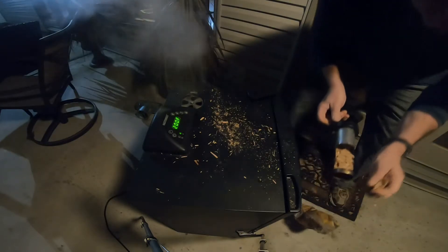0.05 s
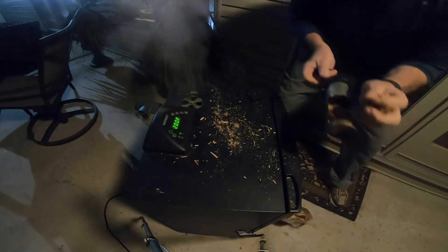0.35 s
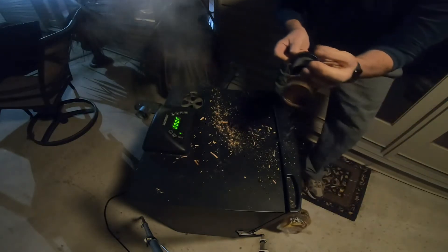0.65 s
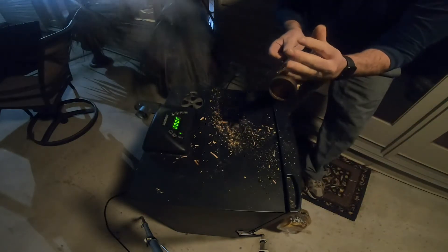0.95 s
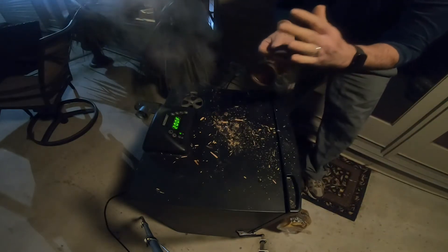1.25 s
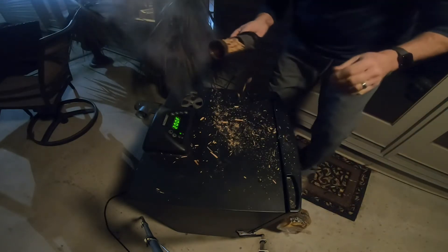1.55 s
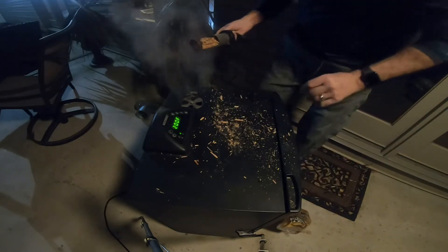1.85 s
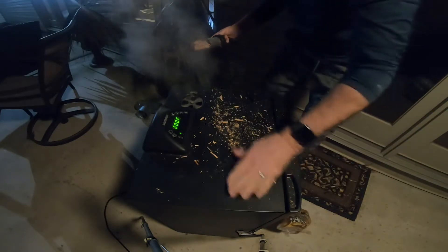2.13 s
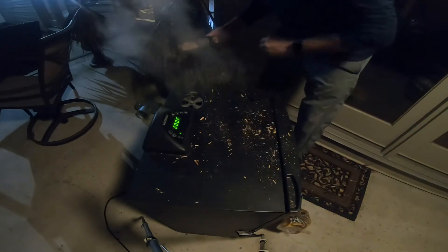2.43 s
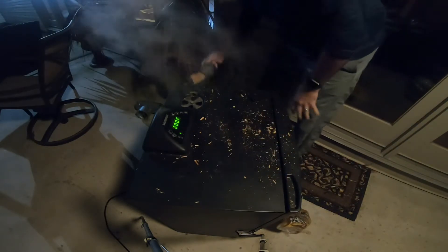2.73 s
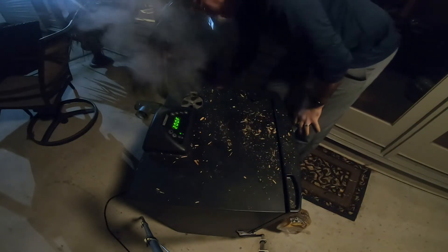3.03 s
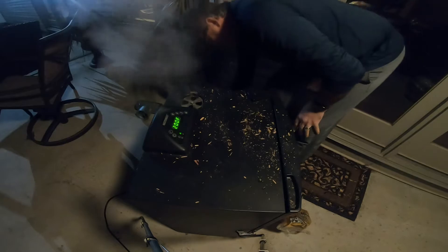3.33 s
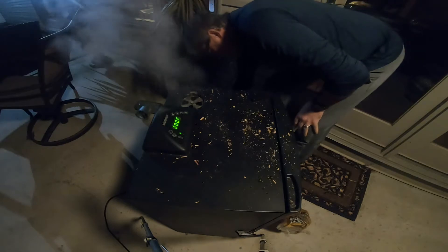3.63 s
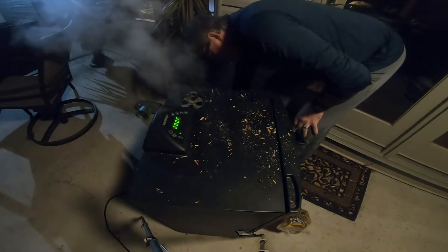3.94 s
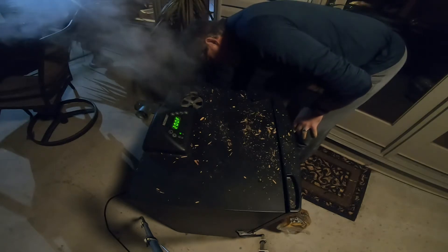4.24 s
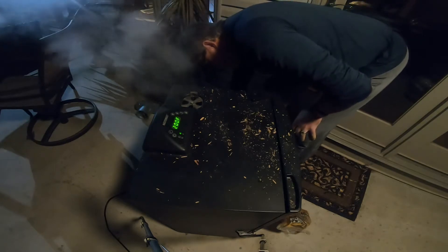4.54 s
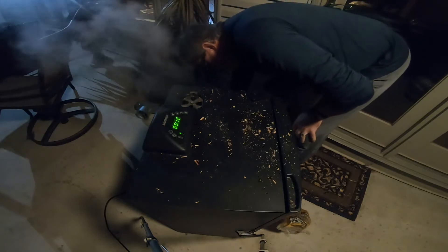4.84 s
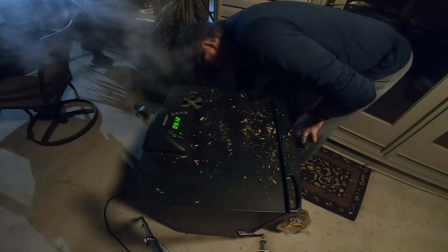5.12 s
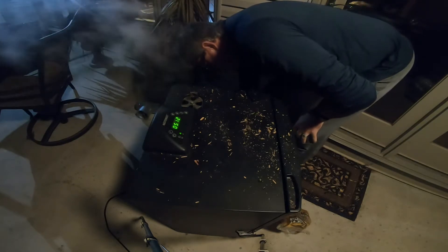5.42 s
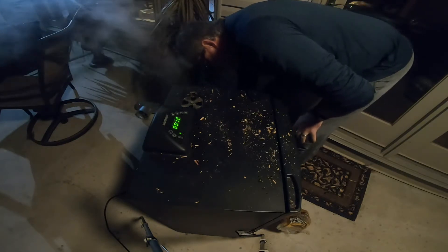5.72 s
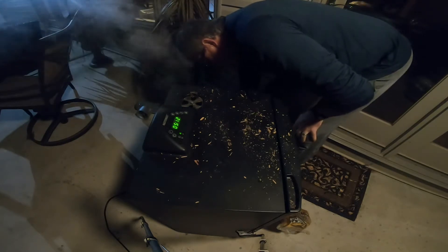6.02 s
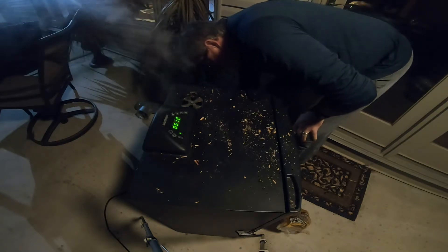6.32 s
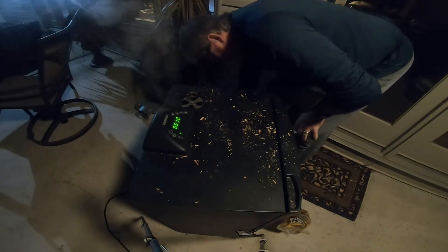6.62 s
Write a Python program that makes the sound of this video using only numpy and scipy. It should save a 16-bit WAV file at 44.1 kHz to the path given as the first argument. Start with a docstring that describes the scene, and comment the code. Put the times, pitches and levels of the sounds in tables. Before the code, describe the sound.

After gritty footsteps, ticking wood chips and a soft sizzle, a metal tube twists into a smoker with scrapes and booming knocks.

```python
"""On a porch at night someone steps up to an electric smoker, shoes scuffing on gritty concrete.
Dry wood chips shift and tick in the metal loader tube they carry. At about 2 seconds a hand sweeps
spilled chips off the lid; then the smouldering tray flares into a soft sizzle that dies away.
From about 3.7 seconds the tube is pushed into its port and twisted: it scrapes, squeaks and knocks,
and the hollow steel cabinet booms."""
import sys
import numpy as np
from scipy import signal
from scipy.fft import rfft, irfft, next_fast_len
from scipy.io import wavfile
from scipy.ndimage import uniform_filter1d, map_coordinates

SR = 44100
rng = np.random.default_rng(int(sys.argv[2]) if len(sys.argv) > 2 else 0)


def int16_out(signal):
    """Quantize to a 16-bit WAV file."""
    q = np.round(np.clip(np.atleast_2d(signal).T, -1, 1) * 32767)
    wavfile.write(sys.argv[1], SR, q.astype(np.int16))


N = 294147
HIT_TIME = np.arange(SR // 2) / SR  # seconds since a blow

# The loader tube's notes. Each row: pitch in Hz, level in dB, t60 (seconds to fade by 60 dB).
TUBE_NOTES = [(2027, -11.5, 0.16), (2000, 1, 0.067), (2250, -6, 0.14), (2500, -10, 0.1), (3070, -15, 0.16),
              (4300, -15, 0.18), (5800, -4.5, 0.11), (6270, -2.5, 0.089)]
# The notes of the sheet steel around the port. Each row: pitch in Hz, level in dB, t60 in seconds.
STEEL_NOTES = [(516, 3, 0.11), (640, -0.5, 0.083), (722, -19, 0.081), (853, -4, 0.34), (962, -2, 0.077),
               (1180, -11, 0.16), (1287, -2, 0.13), (1572, -3.5, 0.14), (1702, -2.5, 0.12),
               (1813, -8.5, 0.3), (2005, -2, 0.091), (2304, -8.5, 0.17), (2640, -12.5, 0.082),
               (2923, -9, 0.14), (4020, -28, .1)]


def amp(db):
    """Turn decibels into a gain."""
    return 10 ** (np.asarray(db) / 20)


def unit(x):
    """Scale a sound to an average (rms) level of 1."""
    return x / np.sqrt(np.mean(x ** 2) + 1e-20)


def crest(x):
    """Scale a blow so that its loudest 4 ms have an rms level of 1."""
    power = uniform_filter1d(np.mean(np.atleast_2d(x) ** 2, axis=0), size=SR // 250)
    return x / np.sqrt(power.max() + 1e-20)


def along(points, hz):
    """Read between (Hz, value) points on a log frequency scale."""
    point_hz, values = np.transpose(points)
    return np.interp(np.log(hz + 1), np.log(point_hz + 1), values)


def wobble(rate):
    """A smooth curve through `rate` random values a second."""
    return map_coordinates(rng.standard_normal(int(N * rate / SR) + 4), [np.arange(N) * rate / SR])


def colour(x, spectrum):
    """Filter a sound by (Hz, dB) points, falling 24 dB an octave beyond their ends."""
    n = x.shape[-1]
    m = 2 * next_fast_len(n // 2 + 4096)
    hz = np.fft.rfftfreq(m, 1 / SR) + 1
    octaves_out = np.log2(hz / np.clip(hz, spectrum[0][0], spectrum[-1][0]))
    gain = np.maximum(amp(along(spectrum, hz) - 24 * np.abs(octaves_out)), 1e-5)
    cepstrum = irfft(np.log(gain))
    cepstrum[1:m // 2] *= 2  # folded so the filter rings after a blow, never before
    cepstrum[m // 2 + 1:] = 0
    return irfft(rfft(x, m) * np.exp(rfft(cepstrum)), m)[..., :n]


def stereo(pair):
    """Blend two unrelated signals into left and right, most alike near 260 and 4500 Hz."""
    # Each row: frequency in Hz, how alike the ears are from 0 to 1.
    likeness = [(30, 0.02), (110, 0), (260, 0.74), (700, 0), (2000, 0.21), (4500, 0.79), (8000, 0),
                (13000, 0.09)]
    m = next_fast_len(pair.shape[-1])
    turn = np.arccos(np.clip(along(likeness, np.fft.rfftfreq(m, 1 / SR)), -1, 1)) / 2
    mid, side = irfft(rfft(pair, m) * [np.cos(turn), np.sin(turn)], m)[:, :pair.shape[-1]]
    return np.array([mid + side, mid - side])


def pan(db):
    """Gains that make the left ear `db` louder than the right."""
    return amp([[db / 2], [-db / 2]])


def add(track, start, sound):
    """Mix a sound into the track at `start` seconds."""
    first = max(round(start * SR), 0)
    track[:, first:first + sound.shape[-1]] += sound[..., :N - first]


def strokes(rows, swell_share, t60):
    """A gain curve from (start, length, dB) rows: each swells, holds, then dies away."""
    t, power = np.arange(N) / SR, np.zeros(N)
    for start, length, db in rows:
        swell = np.sin(np.pi / 2 * np.clip((t - start) / (swell_share * length), 0, 1)) ** 2
        power += (swell * amp(db - 60 * np.clip((t - start - length) / t60, 0, 2))) ** 2
    return np.sqrt(power)


def grains(spectrum, rate, spread_db, smooth):
    """Tiny clicks of random size, `rate` a second, mixed with smooth rubbing noise."""
    sizes = (rng.random(N) < rate / SR) * amp(spread_db * np.clip(rng.standard_normal(N), -2, 2))
    force = unit(sizes * rng.standard_normal((2, N))) + smooth * rng.standard_normal((2, N))
    return unit(colour(stereo(force), spectrum))


def burst(spectrum, t60, tail_db, tail_t60):
    """A crack of noise with a quick fade and a slower tail."""
    fade = amp(-60 * HIT_TIME / t60) + amp(tail_db - 60 * HIT_TIME / tail_t60)
    return crest(colour(stereo(rng.standard_normal((2, len(HIT_TIME)))) * fade, spectrum))


def ring(notes, scatter_db, attack_s, apart, bass_db=0, bass_hz=150, rattle=0):
    """A struck object's fading notes; `rattle` blurs their pitch, `apart` spreads them between the ears."""
    hz, db, t60 = np.transpose(notes)[:, :, None]
    size, detune, phase, side = rng.standard_normal((4, len(notes), 1))
    level = db + scatter_db * size + bass_db / (1 + (hz / bass_hz) ** 6) - 60 * HIT_TIME / t60
    blur = rattle * np.cumsum(rng.standard_normal(level.shape), axis=1)
    swing = 2 * np.pi * hz * (1 + 0.0045 * detune) * HIT_TIME + 0.31 * phase + blur
    ears = np.array([np.sum(amp(level) * np.sin(swing + ear * apart * side), axis=0) for ear in (1, -1)])
    onset = 1 - np.exp(-HIT_TIME / attack_s)
    return crest(colour(ears * onset, [(75, 0.023), (15000, 0.0027)]))  # the deepest bass falls away below 75 Hz


def sing(ringing):
    """Rubbing is a stream of tiny random blows that keeps an object ringing."""
    return unit(signal.fftconvolve(rng.standard_normal((1, N)), ringing, axes=1)[:, :N])


def night_air():
    """Quiet, steady outdoor noise, mostly low."""
    # Each row: frequency in Hz, level in dB.
    air_tone = [(12, -28.5), (20, -10.5), (54, 4), (101, -5.5), (175, 1), (534, -17.5), (767, -8),
                (857, -11), (1100, -20), (1380, -18.5), (2470, -26.5), (6360, -28.5), (8400, -33.5),
                (12400, -36.5), (15500, -42)]
    return amp(-64.5) * unit(colour(stereo(rng.standard_normal((2, N))), air_tone))


def sizzle():
    """Chips shift in the tube and smoulder in the tray, which flares once and dies away."""
    # The load shifting as it is carried. Each row: start in seconds, length in seconds, level in dB.
    shifts = [(0.0, 0.0055, -61), (0.2, 0.62, -74.5), (0.9, 0.25, -82), (1.35, 0.33, -72)]
    # The fine sizzle. Each row: frequency in Hz, level in dB.
    sizzle_tone = [(880, -26), (1500, -10), (1820, -10), (2030, -11.5), (3380, -7.5), (4480, -14),
                   (6370, -3.5), (7450, -6.5), (8370, -17), (12700, -26), (15500, -37)]
    flare_at_s, flare_db, rise_s, dying_db_per_s = 2.81, 12, 0.033, 22
    since_flare = np.maximum(np.arange(N) / SR - flare_at_s, 0)
    smoulder = amp(-80.5 + flare_db * np.minimum(since_flare / rise_s, 1) - dying_db_per_s * since_flare)
    shifting = strokes(shifts, swell_share=0.17, t60=0.53)
    return amp(8) * np.hypot(smoulder, shifting) * grains(sizzle_tone, rate=490, spread_db=6, smooth=1.7)


def knocks():
    """Blows on the smoker: the wall thuds, the hollow cabinet booms, hard contacts add a steel clank."""
    # Each row: start in seconds, level in dB, depth in dB, hardness in dB.
    blows = [(0.011, -41, -29, -7.5), (2.1425, -27.5, -43, -14), (3.684, -36, -27, -12.5),
             (3.751, -24, -10.5, -23), (4.268, -30.5, -50, -3), (4.424, -27.5, -9, -22.5),
             (4.89, -22.5, -15, -25), (4.937, -30.5, -15, -10.5), (4.977, -12.5, -4, -27.5),
             (5.133, -31, -31, -41), (5.39, -15.5, -4.5, -26), (6.298, -23.5, -9, -26)]
    # The cabinet's panels and hollow. Each row: pitch in Hz, level in dB, undamped t60 in seconds.
    cabinet_notes = [(61.4, -16.5, 0.3), (104.2, -12.5, 0.36), (135.5, -1, 0.2), (178.7, 1, 0.23),
                     (196, -2, 0.31), (218.5, 0, 0.23), (257.2, -2, 0.23), (271, -14, 0.042),
                     (331.6, -8, 0.25), (391.6, -19, 1), (459.3, -21.5, 0.35)]
    # The low, middle and high parts of a blow. Each row: frequency in Hz, level in dB.
    thud_tone = [(70, -29), (115, -0.5), (165, 1), (270, 3), (380, -10), (650, -23)]
    clank_tone = [(200, -29.5), (450, -8), (700, 2), (1300, -4), (2000, -1), (3000, -10.5), (5000, -17)]
    clink_tone = [(1500, -26.5), (2800, 5), (3800, 0), (5000, -9.5), (6800, 1), (8000, -8), (9500, -18.5),
                  (15000, -35)]
    out = np.zeros((2, N))
    thud = crest(colour(signal.unit_impulse(len(HIT_TIME)), thud_tone))
    damping = amp(-2 - 60 * HIT_TIME / 2.1)  # the hand on the tube damps the panels
    seating = 1 - np.exp(-HIT_TIME / 0.00093)  # the rim meets its stop bit by bit
    for start, db, depth_db, hard_db in blows:
        boom = ring(cabinet_notes, scatter_db=3, attack_s=0.0026, apart=0.18, bass_db=depth_db + 13.5)
        clank = burst(clank_tone, t60=0.14, tail_db=-10, tail_t60=0.23)
        sheet = ring(STEEL_NOTES, scatter_db=1, attack_s=0.0012, apart=0.31)
        clink = burst(clink_tone, t60=0.13, tail_db=-10, tail_t60=0.27)
        steel = seating * amp(hard_db) * (clank + amp(-3.5) * sheet + amp(-6.5) * clink)
        add(out, start, amp(db - 6.5) * (amp(depth_db + 3.5) * thud + damping * boom + steel))
    return out


def chip_ticks():
    """Single chips snap against the tube; the loose load blurs its ring."""
    # The clearest chip and finger ticks. Each row: start in seconds, level in dB, tube ring in dB.
    ticks = [(0.0989, -30, -5.5), (0.5064, -34, -20), (0.7188, -54.5, 9.5), (0.835, -44.5, 8.5),
             (0.9178, -45.5, -1), (0.992, -35, -14), (1.0577, -36.5, -21), (1.0858, -39.5, -6),
             (1.3763, -43.5, -21), (1.453, -41, -15), (1.5685, -23, -39), (1.6191, -30, -4.5),
             (1.6496, -38, -20), (1.702, -28.5, -14), (1.8135, -38.5, -22), (2.2454, -22.5, -19),
             (2.278, -39, -19), (2.362, -43, -15.5), (2.5263, -36.5, 0), (2.8343, -56, -6)]
    # A tick's body and its bright edge. Each row: frequency in Hz, level in dB.
    snap_tone = [(250, -8.5), (600, -11.5), (1700, -2), (3200, -2), (4500, -10.5), (7000, -12.5),
                 (12000, -41.5)]
    edge_tone = [(2500, -46), (4500, -4), (6300, 11.5), (7500, 6), (8500, -5), (15000, -25.5)]
    out = np.zeros((2, N))
    slots = np.linspace(0.7, 1.9, 15)  # seconds; one faint stray tick in each gap as the tube is lifted
    strays = [(rng.uniform(a, b), -54 + 1.5 * rng.standard_normal(), -10) for a, b in zip(slots, slots[1:])]
    for start, db, ring_db in strays + ticks:
        edge_db = -5.5 - 0.7 * (db + 42)  # heavier chips sound duller
        snap = burst(snap_tone, t60=0.026, tail_db=-5.5, tail_t60=0.092)
        edge = burst(edge_tone, t60=0.012, tail_db=3.5, tail_t60=0.11)
        tube = ring(TUBE_NOTES, scatter_db=4, attack_s=0.0003, apart=0.5, rattle=0.14)
        add(out, start, amp(db - 12) * (snap + amp(edge_db) * edge + amp(ring_db + 1.5) * tube))
    return out


def shoes():
    """Soles land with a hollow note and grind grit over the concrete."""
    # Each row: start in seconds, length in seconds, grit level in dB, dB added for the sole.
    scuffs = [(0.1, 0.036, -38.5, -1), (0.188, 0.044, -40, -0.5), (0.339, 0.11, -53, -11),
              (0.469, 0.069, -46, 3.5)]
    # Footfalls and taps. Each row: start in seconds, level in dB, weight in dB, note in Hz, note in dB.
    steps = [(0.119, -32, -5, 746, 6), (0.207, -30, -9, 820, -21), (0.509, -30, -19, 509, -4.5),
             (1.721, -27, -5, 468.7, -3.5), (2.054, -45.5, -3.5, 821, 2.5), (2.528, -39.5, -20, 678, -11.5)]
    # Grinding grit, rubbing sole and landing tread. Each row: frequency in Hz, level in dB.
    grit_tone = [(530, -16.5), (900, -1.5), (967, -6), (1160, -2.5), (1430, -6), (1950, -1.5), (3300, -7.5),
                 (4550, -15.5), (7320, -7), (8750, -20), (12500, -28.5), (15500, -65)]
    sole_tone = [(76, -48), (130, -31), (174, -4), (354, -12), (506, -1), (552, -8), (715, -2),
                 (827, -22.5), (1300, -3), (1690, -27), (2860, -120)]
    tread_tone = [(150, -32), (450, -5.5), (750, 0), (1200, -7), (2400, -8.5), (4500, -23.5), (7000, -14.5),
                  (9000, -28), (15000, -36)]
    starts, lengths, grit_db, sole_db = np.transpose(scuffs)
    grit = grains(grit_tone, rate=3000, spread_db=4, smooth=0.7) * amp(wobble(130))
    sole = grains(sole_tone, rate=750, spread_db=5.5, smooth=0.5)
    grit_gain = strokes(zip(starts, lengths, grit_db), swell_share=0.56, t60=0.34)
    sole_gain = strokes(zip(starts, lengths, grit_db + sole_db), swell_share=0.56, t60=0.31)
    out = amp(-1.5) * grit_gain * grit + amp(-6) * sole_gain * sole
    for start, db, weight_db, note_hz, note_db in steps:
        tread = burst(tread_tone, t60=0.12, tail_db=0.5, tail_t60=0.17)
        weight = burst([(140, -20.5), (200, -6), (350, -11.5), (600, -21.5)],
                       t60=0.053, tail_db=9, tail_t60=0.26)
        note = ring([(note_hz, 0, 0.13)], scatter_db=0, attack_s=0.00083, apart=0.56, rattle=0.037)
        add(out, start, amp(db - 10) * (tread + amp(weight_db + 3) * weight + amp(note_db) * note))
    return out * pan(-2)


def rim_rubs():
    """A finger or the port lightly rubs the tube's rim and makes it sing."""
    # Each row: start in seconds, length in seconds, level in dB.
    rubs = [(0.765, 0.034, -61.5), (4.4, 0.11, -65.5)]
    singing = sing(ring(TUBE_NOTES, scatter_db=1, attack_s=0.0003, apart=0.4))
    bright = colour(singing, [(1500, -4), (2400, 0.5), (4200, 9), (5500, -1), (7000, 5)])
    return strokes(rubs, swell_share=0.38, t60=0.2) * bright


def lid_sweep():
    """Swept chips skid over the lid, which drums under them; they crackle finer as the hand speeds up."""
    # Rustling chips, their skid and the drumming lid. Each row: frequency in Hz, level in dB.
    rustle_tone = [(290, -9.5), (500, 3), (716, -5), (915, -3.5), (997, -7.5), (1410, -0.5), (2500, -7.5),
                   (2980, -1.5), (4200, -13), (6850, -3.5), (8150, -15), (12500, -21), (15600, -33)]
    skid_tone = [(400, -10), (520, -9), (750, -15), (1000, -18), (1450, 5), (2200, 9), (3000, -1),
                 (4000, -10)]
    lid_tone = [(71, -44), (120, -20), (161, -8), (242, -8), (291, -17.5), (382, -13.5), (700, -40),
                (910, -57), (1540, -120)]
    crackle_tone = [(3000, -21), (6500, -6.5), (8500, 2), (15500, -5)]
    chips_gain = strokes([(2.1512, 0.11, -39)], swell_share=0.51, t60=0.12)
    lid_gain = strokes([(2.172, 0.0892, -43)], swell_share=0.51, t60=0.22)
    speed = np.interp(np.arange(N) / SR, [2.18, 2.3], [0, 1])
    rustle = grains(rustle_tone, rate=3000, spread_db=4, smooth=0.6)
    skid = amp(-8.5) * (1 - speed) * grains(skid_tone, rate=1400, spread_db=4, smooth=0.73)
    crackle = amp(-9.5) * speed * grains(crackle_tone, rate=4200, spread_db=3.5, smooth=0.33)
    drum = lid_gain * grains(lid_tone, rate=570, spread_db=4.5, smooth=0.52)
    return chips_gain * (rustle + skid + crackle) * pan(0.41) + drum


def wander(x, depth_db=3, width_hz=130, lasting_s=0.038):
    """Narrow bands of a rubbing sound rise and sink as the point of contact moves."""
    hz, t, spectra = signal.stft(x, SR, nperseg=512)
    over_pitch = np.exp(-(np.fft.fftfreq(len(hz), hz[1]) * width_hz * 2) ** 2)[:, None]
    over_time = np.exp(-(np.fft.fftfreq(len(t), t[1]) * lasting_s * 2) ** 2)
    patches = np.fft.ifft2(np.fft.fft2(rng.standard_normal(spectra.shape[1:])) * over_pitch * over_time)
    return unit(signal.istft(spectra * amp(depth_db * unit(patches.real)), SR, nperseg=512)[1][:, :N])


def tube_scrapes():
    """The tube sticks and slips in its port: the cabinet rumbles, the rim rasps and hisses, steel sings."""
    # Each row: start and length in seconds, rasp level in dB, dB added for rumble, dB added for hiss.
    pushes = [(3.76, 0.041, -72.5, 29.5, -3), (4.266, 0.016, -46, 10, 0.5), (4.411, 0.059, -59, 23, -4.5),
              (4.531, 0.19, -61, 15, -1), (4.723, 0.18, -52, 9, -7.5), (4.87, 0.063, -53, 22.5, -8),
              (4.927, 0.064, -42.5, 13, -19.5), (4.998, 0.19, -76, 30, -15),
              (5.328, 0.055, -54.5, 13.5, -15), (5.373, 0.036, -45.5, 15, -17),
              (5.459, 0.045, -51.5, 12.5, -14), (5.59, 0.075, -54, 21, -14.5),
              (5.657, 0.082, -51.5, 16.5, -22), (5.83, 0.085, -80.5, 24, -8), (6.164, 0.026, -46, 1.5, -19),
              (6.182, 0.03, -44, 6.5, -11.5), (6.243, 0.13, -46.5, 11.5, -11.5),
              (6.388, 0.067, -44.5, 4.5, -10.5), (6.449, 0.058, -60, 25, -23)]
    # The low, middle and high parts of a scrape. Each row: frequency in Hz, level in dB.
    rumble_tone = [(24, -8.5), (40, -4), (81, -17.5), (102, -28), (134, 2), (214, 2.5), (262, -1.5),
                   (301, -6.5), (337, -3), (418, -20), (457, -25.5), (489, -29), (530, -22), (600, -25),
                   (780, -42), (1320, -120)]
    rasp_tone = [(260, -23), (450, 10), (493, -2.5), (644, 2), (867, -11), (990, -7), (1200, -11),
                 (1320, -10.5), (1970, -11.5), (3080, -20.5), (4030, -16.5), (4410, -51.5), (5200, -64),
                 (6760, -81), (11400, -120)]
    hiss_tone = [(2820, -18), (4800, -3), (6300, 1.5), (7620, -1.5), (8070, -4.5), (8270, -10.5),
                 (12300, -20), (15000, -31.5)]
    starts, lengths, rasp_db, rumble_db, hiss_db = np.transpose(pushes)
    rumble_gain = strokes(zip(starts, lengths, rasp_db + rumble_db), swell_share=0.42, t60=0.38)
    rasp_gain = strokes(zip(starts, lengths, rasp_db), swell_share=0.42, t60=0.26)
    hiss_gain = strokes(zip(starts, lengths, rasp_db + hiss_db), swell_share=0.42, t60=0.26)
    catches = amp(1.2 * wobble(80))
    rumble = amp(-2.5) * rumble_gain * grains(rumble_tone, rate=450, spread_db=3, smooth=0.66)
    rubbing = grains(rasp_tone, rate=800, spread_db=4, smooth=0.6)
    damping = amp(-60 * HIT_TIME / 0.11)  # the pressed rim damps the sheet
    singing = sing(damping * ring(STEEL_NOTES, scatter_db=0, attack_s=0.0002, apart=0.57))
    rasp = amp(-0.5) * rasp_gain * wander(rubbing + singing / 2)
    hiss = amp(-4) * hiss_gain * wander(grains(hiss_tone, rate=4900, spread_db=5, smooth=1))
    return rumble + catches * (rasp + hiss)


def squeaks():
    """For a moment the tube's slips almost fall into step and give a hoarse, gliding tone."""
    # Each row: start and length in seconds, pitch in Hz, glide as a share of the pitch, level in dB.
    squeals = [(4.421, 0.046, 1890, -0.11, -56), (4.613, 0.03, 2600, 0.19, -63.5),
               (4.898, 0.057, 4100, 0.029, -57.5), (4.935, 0.035, 995, -0.08, -44),
               (4.938, 0.043, 2236, -0.058, -53), (4.977, 0.04, 677, -0.17, -41),
               (5.402, 0.033, 664, -0.095, -42)]
    out = np.zeros((2, N))
    for start, length, hz, glide, db in squeals:
        progress = np.minimum(HIT_TIME / length, 1)
        jitter = np.sqrt(hz / SR) * np.cumsum(rng.standard_normal(len(progress))) / 2  # uneven cycles
        swing = 2 * np.pi * np.cumsum(hz * (1 + glide * (progress - 0.5))) / SR + jitter
        tone = colour(np.sin(np.pi * progress) * np.sin(swing), [(hz / 2, -6), (hz, 0), (1.5 * hz, -4)])
        add(out, start, amp(db + 3) * tone)
    return out


def porch_echo(x):
    """The house wall and roof throw the sound back; the treble dies first."""
    # Each row: frequency in Hz, t60 in seconds.
    echo_times = [(100, 0.45), (400, 0.31), (2000, 0.31), (7000, 0.16), (14000, 0.18)]
    hz, t, spectra = signal.stft(stereo(rng.standard_normal((2, len(HIT_TIME)))), SR, nperseg=256)
    tail = signal.istft(spectra * amp(-60 * t / along(echo_times, hz)[:, None]), SR, nperseg=256)[1]
    delayed = np.pad(tail / np.linalg.norm(tail[0]), ((0, 0), (SR // 150, 0)))
    return signal.fftconvolve(x, delayed, axes=1)[:, :N]


def place(x):
    """Tip each frequency towards the side it comes from, mostly the right."""
    # Each row: frequency in Hz, left minus right in dB.
    balance = [(60, -4.5), (130, 0.3), (380, -3.5), (700, -4.5), (1300, 0), (4400, -1.2), (8000, 2),
               (15000, -0.5)]
    m = next_fast_len(N + SR // 2)
    lean = along(balance, np.fft.rfftfreq(m, 1 / SR)) / 2
    return irfft(rfft(x, m) * amp([lean, -lean]), m)[:, :N]


def scene():
    """Mix the steps and handling with their echo, the night air and the sizzle."""
    near = shoes() + chip_ticks() + lid_sweep() + tube_scrapes() + rim_rubs() + squeaks() + knocks()
    near = colour(near, [(40, -14), (62, 0), (15500, 0)])  # trim the deepest bass
    return place(near + amp(-11) * porch_echo(near) + night_air() + sizzle())


def record(dry):
    """Cut off the very highest treble."""
    top_hz = 15700
    m = next_fast_len(N + SR // 2)
    return irfft(rfft(dry, m) * (np.fft.rfftfreq(m, 1 / SR) < top_hz), m)[:, :N]


dry = scene()
out = record(dry)
int16_out(out)
```